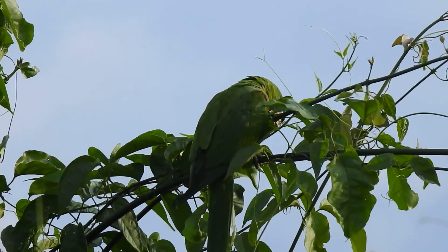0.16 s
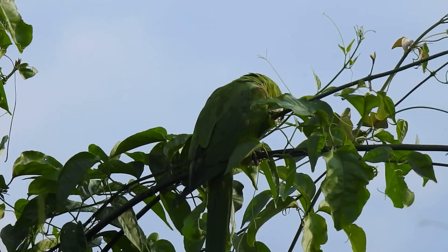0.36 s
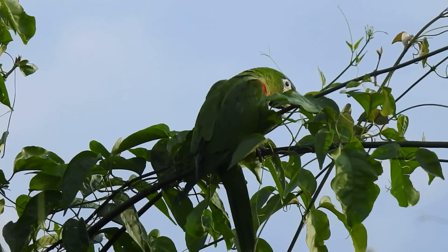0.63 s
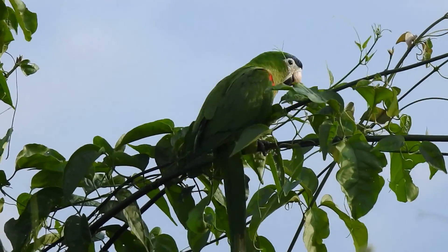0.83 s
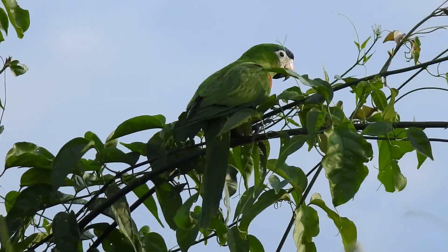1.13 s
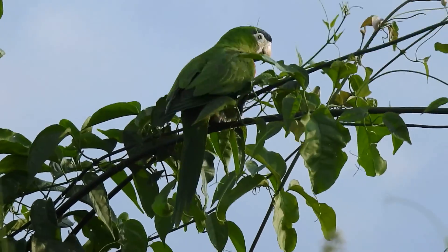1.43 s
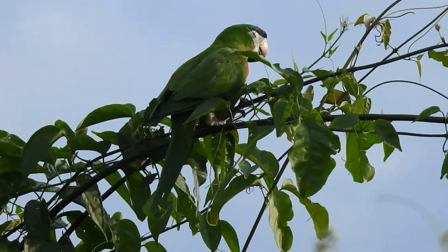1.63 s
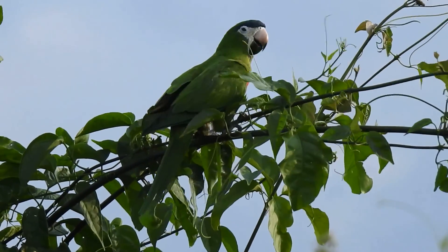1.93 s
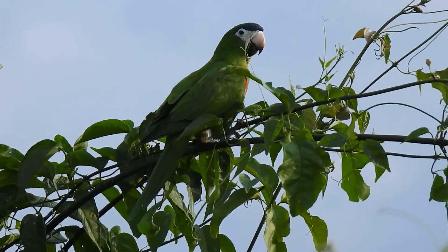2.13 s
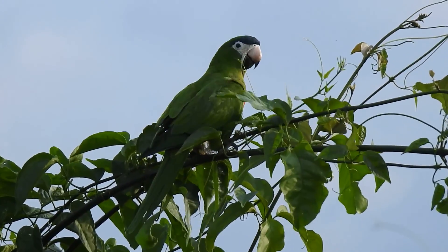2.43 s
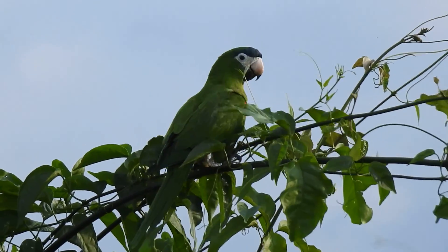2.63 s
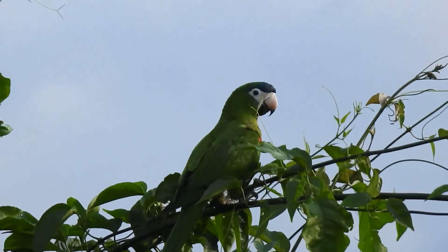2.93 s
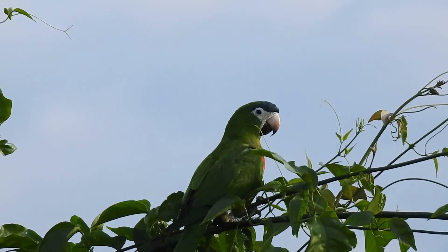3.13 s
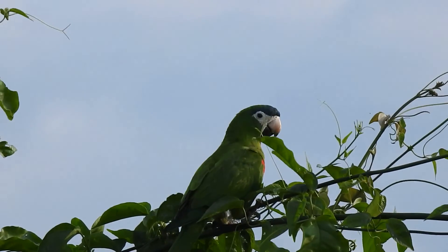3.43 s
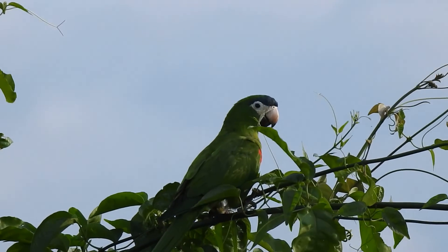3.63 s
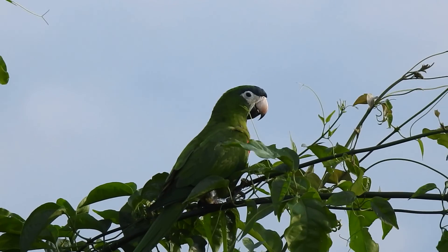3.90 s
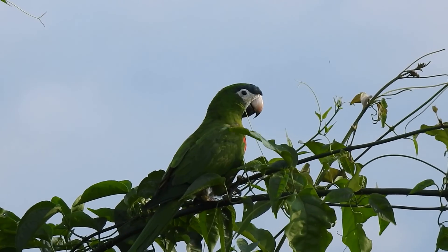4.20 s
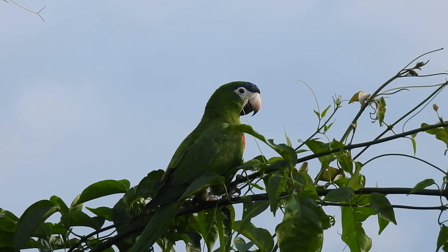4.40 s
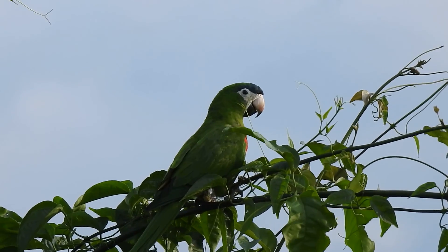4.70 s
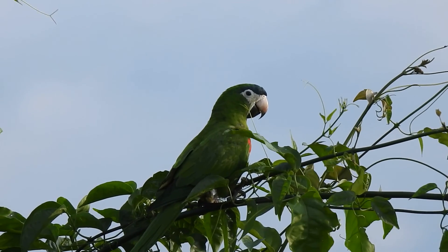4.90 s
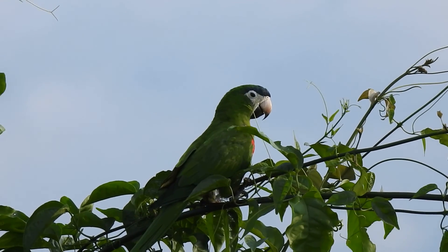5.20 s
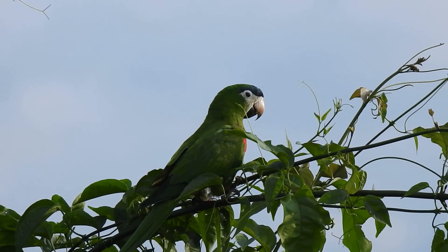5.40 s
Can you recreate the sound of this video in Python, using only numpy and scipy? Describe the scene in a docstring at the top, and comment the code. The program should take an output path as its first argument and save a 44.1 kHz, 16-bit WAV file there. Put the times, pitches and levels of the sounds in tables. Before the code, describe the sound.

Outdoors among trees, several parrots trade brief, hoarse squawks at different distances from the microphone, the closest and loudest just past the middle. Small birds fill the gaps with high chirps and quick twittering that grows busier toward the end. Behind them are gently moving air, a few faint hoots, a thin insect buzz throbbing on the left and a distant engine hum that swells slightly late on.

```python
"""Parrots squawk from a tree top in open country, harsh harmonic calls with a fast warble. First come
far calls and two hoarse ones on the right, over moving air, a distant engine and a throbbing insect.
Small birds twitter shrilly in the gaps, with a few soft hoots. A rasping squawk lands near 1.8 s, the
closest and loudest at 3.2 s. From 4 s darker, thinner calls follow, the twitter thickens and the engine
swells. Leaves scatter every call."""
import sys
import numpy as np
from scipy import signal
from scipy.fft import rfft, irfft
from scipy.io import wavfile
from scipy.ndimage import uniform_filter1d, minimum_filter1d

SR = 44100
rng = np.random.default_rng(int(sys.argv[2]) if len(sys.argv) > 2 else 0)


def generate_wav(signal):
    """Clip the signal to [-1, 1] and save it as 16-bit WAV at the path in sys.argv[1]."""
    frames = np.transpose(np.atleast_2d(signal))
    scaled = np.clip(frames, -1, 1) * 32767
    pcm = np.round(scaled).astype(np.int16)
    wavfile.write(sys.argv[1], SR, pcm)


N = 244755

# The parrots' cue list. Each row: voice, start, length, rise and fall in seconds, pitch in Hz at the
# onset, hold start, hold end and finish, relative level in dB, drift over the call in dB, beak band in dB.
# The key "left" marks the voice whose left channel is weak and late: this bird is heard on the right.
SQUAWKS = [("far", 0.0, .05, 0.011, 0.0397, 738, 740, 700, 530, -29.5, -32, 2.9),
           ("far", .05, 0.11, 0.018, 0.064, 800, 1100, 785, 800, -35, 3.2, -14),
           ("left", 0.16, .332, .13, .1, 520, 730, 710, 603, -24, -3.5, 10.6),
           ("far", .49, .16, 0.0406, 0.046, 870, 720, 910, 800, -35.5, -4, 1),
           ("left", 0.675, .29, .13, .1, 500, 755, 715, 566, -25.5, 0.48, 13.4),
           ("clear", 1.672, 0.114, .065, .01, 430, 845, 835, 630, -31.5, 5.1, -2.1),
           ("rasp", 1.765, .29, 0.092, 0.15, 624, 830, 760, 625, -21.5, 0, 4.7),
           ("middle", 1.985, .135, 0.0438, 0.0343, 749, 820, 910, 800, -18.5, 0, -1.5),
           ("clear", 2.66, 0.12, 0.093, 0.016, 740, 780, 865, 1200, -31.5, 2.7, 8.4),
           ("high", 2.89, .31, .15, .11, 521, 760, 745, 625, -30.5, -0.87, 11.9),
           ("near", 3.23, 0.25, .08, .06, 550, 815, 785, 623, -14.5, 0, 1.1),
           ("far", 3.62, 0.1085, 0.0413, 0.028, 640, 610, 772, 880, -44, 0, 14.5),
           ("low", 4.03, .18, .08, 0.0215, 490, 730, 860, 450, -22, 0, 0),
           ("narrow", 4.2, .37, 0.0252, .12, 790, 700, 670, 730, -29, -2.2, 8.5),
           ("low", 4.36, .218, .09, .03, 520, 680, 810, 440, -23.5, 0, 2),
           ("narrow", 5.24, .29, .04, 0.049, 725, 710, 700, 680, -37, 0, 17)]
# Tone and placement by voice. Each row: throat centre and width in Hz, fundamental and upper beak trims
# in dB, warble rate in Hz, left-over-right balance of throat and of beak in dB, left lag in samples.
VOICES = {"left": (1759, 1503, -18.5, -5.5, 66, -6, 1.7, 2),
          "near": (3117, 1800, -22.5, 8, 59.5, -1, 2, -0.8),
          "rasp": (2660, 2400, -20.5, 1.2, 61.5, -0.7, 2, -1),
          "low": (1607, 867, -25, -6, 62, -6.5, -0.5, 2), "clear": (2950, 3000, -20, 5, 55, -.4, 2, 1.2),
          "middle": (3002, 2400, -21, 1, 61, -2.5, 6.5, 0.1),
          "high": (3205, 798, -25.5, 0.5, 61.5, .3, 3, 1.94),
          "narrow": (2113, 470, -22.5, 2, 41.5, -1.1, 5.5, 3.5),
          "far": (2495, 2204, -11.5, 5.5, 64, -2, 2.5, 2.5)}
# Grit by voice. Each row: base roughness, warble depth as a share of pitch.
VOICE_GRIT = {"left": (.22, .056), "near": (.1, .048), "rasp": (.17, .068), "low": (.26, .052),
              "clear": (.1, .016), "middle": (.17, .04), "high": (.21, .052), "narrow": (.28, .036),
              "far": (.36, .035)}


def parrots():
    """Parrots call near and far, each in its own voice."""
    out = np.zeros((2, N))
    for name, start, *call in SQUAWKS:
        add(out, squawk(call, VOICES[name], *VOICE_GRIT[name]), start)
    return out


def squawk(call, voice, hoarseness, warble_depth):
    """A warbling, jittering syrinx sounds through throat and beak; breath rasps through the same tract."""
    throat_hz, width_hz, fundamental_db, upper_db, warble_hz, throat_pan_db, beak_pan_db, lag = voice
    hz, db, beak_db, crack = call_contour(*call)
    n = len(hz)
    rough = hoarseness + .6 * crack
    warble_phase = phase_of(warble_hz * (1 + .2 * walk(n, 40))) + 2 * np.pi * rng.random()
    warble = warble_depth * np.linspace(1, .5, n) * (1 + .3 * walk(n, 30)) * np.sin(warble_phase)
    hz = hz * (1 + warble + .045 * rough * walk(n, 400))
    order = np.arange(1, 21)[:, None]
    throat, beak = tract(order * hz, throat_hz, width_hz, upper_db)
    # the weak fundamental comes and goes, and shows most where the pitch is low
    throat[0] = undb(fundamental_db - 23.5 * np.log2(hz / np.median(hz)) + 4.6 * walk(n, 39.6))
    throat, beak = (np.sqrt(2) * band / np.sqrt(uniform_filter1d((band ** 2).sum(axis=0), size=1500))
                    for band in (throat, beak))  # even out each band's power
    fray = np.array([undb(9 * rough * walk(n, 170)) for _ in order])
    freqs = np.arange(n // 2 + 1) * SR / n
    hiss = rfft(rng.standard_normal(n)) * np.minimum(freqs / 1200, 1) ** 2
    breath_bands = tract(freqs, throat_hz, width_hz, upper_db)
    out = []
    for side in (.5, -.5):  # left, right
        throat_gain, beak_gain = undb(side * throat_pan_db), undb(beak_db + side * beak_pan_db)
        partials = np.sin(order * phase_of(hz, side * lag) + .9 * order ** 2)
        tone = ((throat * throat_gain + beak * beak_gain) * fray * partials).sum(axis=0)
        delayed_hiss = hiss * np.exp(-2j * np.pi * freqs * side * lag / SR)
        throat_air, beak_air = (unit(irfft(delayed_hiss * band, n)) for band in breath_bands)
        breath = undb(-6.5) * throat_gain * throat_air + undb(-1) * beak_gain * beak_air
        out.append(tone + rough * breath)
    return np.array(out) * undb(db - 3) * fade(n, .01)


def call_contour(length, rise_s, fall_s, onset_hz, from_hz, to_hz, end_hz, db, drift_db, beak_db):
    """Pitch eases into a hold and out; off the hold the call softens and the beak closes; the ends crack."""
    t = np.arange(int(length * SR)) / SR
    held = np.linspace(from_hz, to_hz, len(t))
    hz = held + (onset_hz - from_hz) * np.maximum(1 - t / rise_s, 0) ** 2.1
    hz = hz + (end_hz - to_hz) * np.maximum(1 - (length - t) / fall_s, 0) ** 1.9
    octaves_off = np.abs(np.log2(hz / held))
    level_db = db - 20 * octaves_off + drift_db * (t / length - .5)
    crack = .04 + .7 * np.exp(-np.minimum(t, length - t) / .028)
    return hz, level_db, beak_db - 9.5 * octaves_off, crack


# The bright ring of the open beak. Each row: centre in Hz, width in Hz, relative gain in dB.
BEAK_RESONANCES = [(4523, 1190, -2.5), (5796, 780, 1.5), (7090, 1500, -11.5)]


def tract(hz, throat_hz, width_hz, upper_db):
    """Gains of two bands: the throat resonance gives body, the beak resonances give edge."""
    throat = peak(hz, throat_hz, width_hz) * peak(np.maximum(hz, 5000), 5000, 3000)
    beak = sum(undb(db + upper_db * (k > 0)) * peak(hz, centre, width)
               for k, (centre, width, db) in enumerate(BEAK_RESONANCES))
    rolloff = peak(np.maximum(hz, 7600), 6550, 2300)
    sheen = undb(-37.5 + 1.6 * upper_db) * peak(hz, 10600, 2100) + undb(-59) * peak(hz, 13500, 3500)
    return throat, beak * rolloff + sheen


# Small birds' clear notes. Each row: start and length in seconds, first and last pitch in Hz, level in dB.
NOTES = [(0.572, 0.025, 1495, 1000, -26), (0.628, 0.036, 2300, 2270, -31), (0.657, .023, 2410, 2400, -25.5),
         (0.969, 0.069, 3050, 3050, -37.5), (0.988, .038, 2240, 2210, -31), (1.092, 0.025, 2330, 2230, -26),
         (1.117, 0.0575, 2820, 2870, -35), (1.137, .027, 2126, 2120, -35),
         (1.178, 0.019, 2190, 2250, -35.5), (1.297, 0.031, 2112, 2240, -38),
         (2.116, 0.0214, 2220, 1930, -23), (2.121, .066, 2960, 2860, -31),
         (2.145, 0.028, 2080, 2030, -28.5), (2.29, 0.04, 2730, 2800, -37),
         (2.321, 0.049, 2017, 2340, -29.5), (2.404, .04, 2053, 2020, -36.5),
         (2.506, 0.038, 2120, 2340, -27), (2.51, 0.06, 2920, 2870, -32.5), (2.541, 0.022, 1885, 2030, -27),
         (2.555, .02, 2670, 2670, -32), (2.621, 0.0298, 2380, 3100, -32), (2.656, .12, 3110, 2870, -34),
         (2.798, 0.0182, 2640, 3000, -36), (2.841, 0.047, 2060, 2100, -45),
         (3.625, 0.027, 2270, 2140, -31.5), (3.646, 0.069, 3080, 3000, -31.5),
         (3.677, 0.027, 2126, 2240, -27.5), (3.71, .011, 2200, 5200, -36),
         (3.774, 0.0603, 2000, 2200, -35.5), (3.833, .047, 2665, 3400, -23.5),
         (3.869, .054, 2264, 2250, -22), (3.877, 0.07, 2960, 2970, -23), (3.95, 0.0866, 2180, 2140, -25.5),
         (3.965, .036, 3024, 3030, -24), (4.001, 0.0575, 3160, 2930, -25.5), (4.114, .029, 3057, 3100, -23),
         (4.139, 0.021, 2340, 2240, -20), (4.158, 0.046, 2940, 2800, -26.5),
         (4.278, 0.032, 2220, 2770, -22), (4.296, 0.034, 2965, 2940, -20.5),
         (4.348, 0.064, 3030, 3000, -23.5), (4.402, .035, 2136, 2270, -23.5),
         (4.505, 0.07, 2177, 2140, -29.5), (4.66, 0.035, 2170, 2800, -36.5),
         (4.873, 0.047, 1984, 2160, -30.5), (4.881, .018, 2430, 4700, -36), (4.99, 0.018, 1860, 2900, -46),
         (5.03, .016, 3590, 2800, -41), (5.026, 0.0248, 2032, 2230, -34.5), (5.087, 0.014, 2210, 3000, -25),
         (5.102, 0.086, 2412, 2380, -20.5), (5.113, 0.012, 2430, 3400, -15), (5.13, .084, 3240, 2900, -28),
         (5.169, 0.011, 2260, 2200, -27), (5.211, 0.139, 2920, 2900, -23), (5.216, 0.12, 2170, 2320, -24),
         (5.341, .085, 2250, 2000, -23), (5.348, 0.022, 2380, 2500, -19.5), (5.386, .09, 2744, 3050, -24.5),
         (5.431, 0.0986, 2190, 2120, -23.5), (5.502, 0.0515, 2986, 2700, -22)]
# A lower singer on the right, a higher one on the left. Each row: home pitch in Hz, fundamental
# against its octave in dB, left-over-right balance in dB.
SINGERS = [(2250, -29, -7), (2850, -15, 8.5)]


def clear_notes():
    """Short fluttering glides, each sung by the small bird nearest in pitch."""
    out = np.zeros((2, N))
    for start, length, hz0, hz1, db in NOTES:
        _, fundamental_db, pan_db = min(SINGERS, key=lambda singer: abs(singer[0] - hz0))
        n = int(length * SR)
        hz = np.linspace(hz0, hz1, n) * (1 + .023 * walk(n, 380) + .01 * walk(n, 60))
        note = small_syrinx(hz, fundamental_db, third_db=-24, lag=-.22 * pan_db, pan_db=pan_db)
        add(out, note * undb(db + 4 * walk(n, 120)) * fade(n, .008), start)
    return out


# Bursts of chatter. Each row: start and length in seconds, first and last relative level in dB.
TWITTER = [(0.028, 0.15, -27, -41), (0.479, 0.23, -19.5, -32), (0.955, 0.13, -24, -35),
           (1.071, 0.13, -23, -38.5), (2.098, .28, -26, -29), (2.432, 0.18, -28, -26.5),
           (2.599, 0.21, -25, -25), (3.559, 0.12, -38, -19), (3.723, 0.11, -29, -29),
           (3.833, 0.12, -21, -22), (3.95, 0.25, -21.5, -20), (4.202, .36, -17.5, -16.5),
           (4.538, .2, -17.5, -28.5), (4.836, 0.082, -36, -27), (4.978, .085, -34.5, -28),
           (5.085, 0.058, -20, -20.5), (5.18, 0.42, -18, -22)]
# The pitches the chatter jumps between, in Hz.
REGISTERS_HZ = [1780, 2168, 2204, 2532, 2958]


def twitter():
    """Three small birds at once flip between registers in fast slurs."""
    out = np.zeros((2, N))
    hold, slur = int(.014 * SR), int(.0051 * SR)
    for start, length, db0, db1 in TWITTER:
        n = int(length * SR)
        for lag in (2.2, -1.5, .7):
            steps = np.repeat(rng.choice(REGISTERS_HZ, size=n // hold + 1), hold)[:n]
            hz = uniform_filter1d(1. * steps, slur) * (1 + .07 * walk(n, 500) + .08 * walk(n, 120))
            envelope = undb(np.linspace(db0, db1, n) - 14 + 3.3 * walk(n, 69.8)) * fade(n, .013)
            chatter = small_syrinx(hz, fundamental_db=-17, third_db=-7.5, lag=lag, pan_db=-.41)
            add(out, chatter * envelope, start)
    return out


def small_syrinx(hz, fundamental_db, third_db, lag, pan_db):
    """A shrill voice of four partials, the octave strongest."""
    out = []
    for side in (.5, -.5):
        phase = phase_of(hz, side * lag)
        body = np.sin(2 * phase) + undb(fundamental_db) * np.sin(phase)
        third = undb(third_db) * np.sin(3 * phase) * peak(np.maximum(3 * hz, 7000), 7200, 2330)
        fourth = undb(-29.5) * np.sin(4 * phase)
        out.append(undb(side * pan_db) * (body + third + fourth))
    return np.sqrt(2) * np.array(out)


# Far-off hoots. Each row: start and length in seconds, first and last pitch in Hz, level in dB.
HOOTS = [(0.086, 0.052, 674, 530, -40.5), (0.96, 0.13, 1013, 720, -46.5), (2.368, 0.148, 520, 640, -45),
         (2.415, 0.065, 965, 970, -46.5)]


def hoots():
    """Soft low tones in the centre, made breathy by pitch jitter."""
    out = np.zeros((2, N))
    for start, length, hz0, hz1, db in HOOTS:
        n = int(length * SR)
        hz = np.linspace(hz0, hz1, n) * (1 + .07 * walk(n, 200))
        envelope = undb(db + 3.4 * walk(n, 56)) * fade(n, .016)
        add(out, np.sin(phase_of(hz)) * envelope * np.ones((2, 1)), start)
    return out


# Tails of the near foliage and of far trees. Each row: time to fall 60 dB in seconds, relative level in dB.
LEAF_TAILS = [(.09, 6.5), (.5, -4.5)]


def leaves(calls):
    """Foliage scatters the calls into a short reverb, thin in the bass and wide in the treble."""
    t = np.arange(int(.6 * SR)) / SR
    decay = sum(undb(db - 60 * t / t60) / np.sqrt(t60) for t60, db in LEAF_TAILS)
    tail = rng.standard_normal((2, len(t))) * decay * np.minimum(t / .0019, 1) / np.sqrt(SR)
    mid, side = signal.fftconvolve(calls.mean(axis=0, keepdims=True), tail, axes=1)[:, :N]
    side = colour(side, [(1000, -23.5), (2500, -11), (4500, -.5), (8000, 6.5)])
    return colour(np.array([mid + side, mid - side]), [(500, -2), (1500, 3), (4000, 2.5), (9000, -2.5)])


def insect(first_pulse_s=.068, period_s=.138, width_s=.014):
    """A high buzz throbs in even pulses, hard left."""
    from_pulse = (np.arange(N) / SR - first_pulse_s + period_s / 2) % period_s - period_s / 2
    buzz = noise([(6000, -43), (8300, -5), (10000, -.5), (12000, -5.5), (15500, -22)])
    return undb(-57) * buzz * np.exp(-(from_pulse / width_s) ** 2) * np.array([[2.03], [.03]])


# The engine's drone. Each row: pitch in Hz, level in dB before the swell.
ENGINE_TONES = [(86.1, -58.5), (156.1, -62.5), (231.5, -59.5)]
# Its fader ride. Each row: time in seconds, gain in dB.
ENGINE_SWELL = [(0, -5), (4.1, -2.5), (4.5, 6), (5.55, 7.5)]


def engine():
    """A far engine hums on three wavering tones and swells near the end."""
    drone = sum(undb(db) * np.sqrt(2) * np.sin(phase_of(hz * (1 + .0113 * walk(N, 18))))
                for hz, db in ENGINE_TONES)
    return drone * undb(np.interp(np.arange(N) / SR, *np.transpose(ENGINE_SWELL)))


# The tone of the open-air bed. Each row: frequency in Hz, relative level in dB.
AIR_SPECTRUM = [(30, -30), (60, 1), (120, -0.5), (250, -12), (300, -12), (400, -17), (560, -9.5),
                (750, -16), (1050, -8.5), (1500, -21.5), (3000, -25), (4500, -23.5), (7000, -29.5),
                (11000, -28), (15500, -40.5)]


def air():
    """Gently heaving air, near mono in the bass, with patches of low rustle."""
    mid = noise(AIR_SPECTRUM)
    side = colour(noise(AIR_SPECTRUM), [(60, -21), (250, -6), (900, -15), (2700, -2), (8000, 2.5)])
    rustle = colour(mid, [(150, -22), (260, -9.5), (600, 2), (1100, -23)]) * .23 * walk(N, 4.6)
    return undb(-47.5 + .8 * walk(N, 3)) * (np.array([mid + side, mid - side]) + rustle)


def undb(db):
    return 10 ** (np.asarray(db) / 20)


def unit(x):
    return x / np.sqrt(np.mean(x ** 2))


def phase_of(hz, lag=0):
    """Running phase of a pitch curve, delayed by lag samples."""
    return 2 * np.pi * (np.cumsum(hz) - lag * hz) / SR


def walk(n, rate):
    """Smooth random wobble, rate steps a second, spread near 1."""
    k = max(int(SR / rate), 1)
    steps = np.repeat(rng.standard_normal(n // k + 1), k)
    return 1.3 * uniform_filter1d(uniform_filter1d(steps, k), k)[:n]


def colour(x, points):
    """EQ through (Hz, dB) points joined on a log-frequency axis."""
    hz, db = np.transpose(points)
    freqs = np.arange(N // 2 + 1) * SR / N + 1
    return irfft(rfft(x) * undb(np.interp(np.log(freqs), np.log(hz), db)), N)


def noise(points):
    return unit(colour(rng.standard_normal(N), points))


def peak(hz, centre_hz, width_hz):
    """Resonance with gain 1 at the centre."""
    return 1 / (1 + (2 * (hz - centre_hz) / width_hz) ** 2)


def fade(n, edge_s):
    from_edge = np.minimum(np.arange(n), n - np.arange(n))
    return np.sin(np.pi / 2 * np.clip(from_edge / (edge_s * SR), 0, 1)) ** 2


def add(out, piece, start_s):
    i = max(int(start_s * SR), 0)
    out[:, i:i + piece.shape[1]] += piece[:, :N - i]


def scene():
    """The parrots perch clear of the foliage, so they stir less reverb than the small birds."""
    small_birds = clear_notes() + twitter() + hoots()
    squawks = parrots()
    reverb = leaves(small_birds + undb(-3) * squawks)
    return squawks + small_birds + reverb + air() + engine() + insect()


# The colour of the microphone in its housing. Each row: frequency in Hz, gain in dB.
MICROPHONE_EQ = [(2500, -0.5), (3150, 3), (3700, -6.5), (4250, 1), (5100, 0.5), (5850, 0.5), (7600, -0.9),
                 (8600, -4.5), (12000, -6.5)]


def record(dry, ceiling=.88, top_hz=15750):
    """The housing colours the treble, a limiter holds the loudest peaks and a steep filter cuts the top."""
    x = colour(dry, MICROPHONE_EQ)
    gain = np.minimum(ceiling / (np.abs(x).max(axis=0) + 1e-9), 1)
    x = x * uniform_filter1d(minimum_filter1d(gain, size=401), size=401)
    return signal.sosfilt(signal.ellip(10, .2, 70, top_hz, fs=SR, output="sos"), x)


dry = scene()
out = record(dry)
generate_wav(out)
```